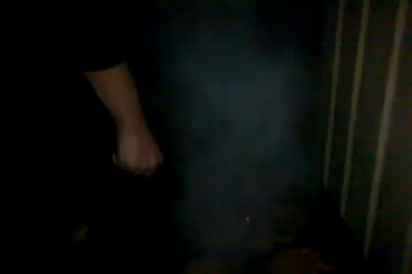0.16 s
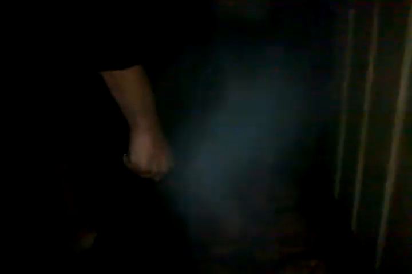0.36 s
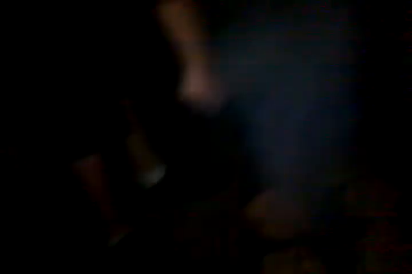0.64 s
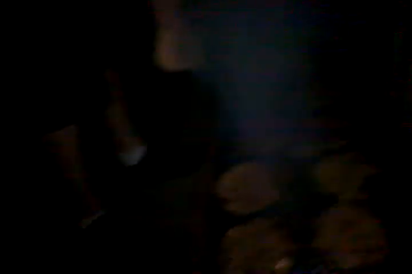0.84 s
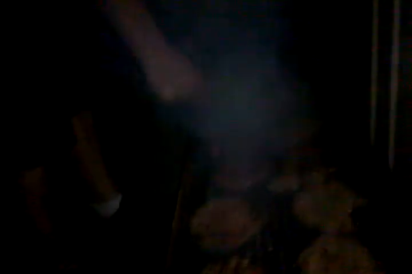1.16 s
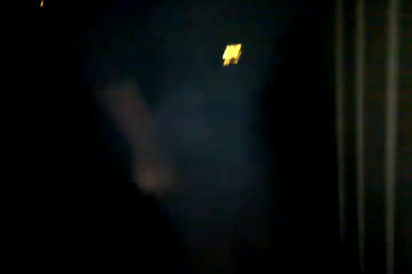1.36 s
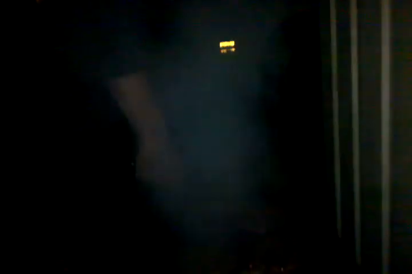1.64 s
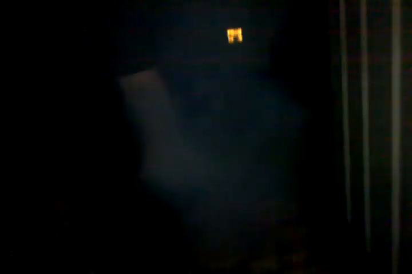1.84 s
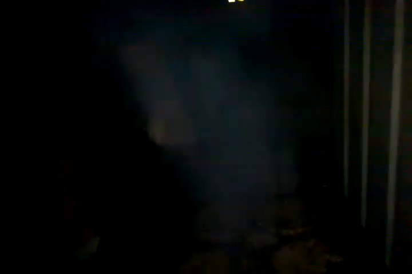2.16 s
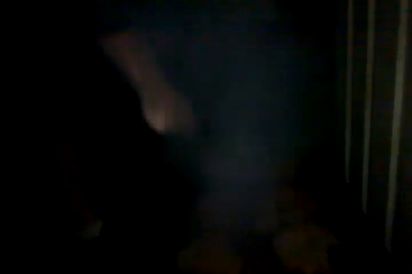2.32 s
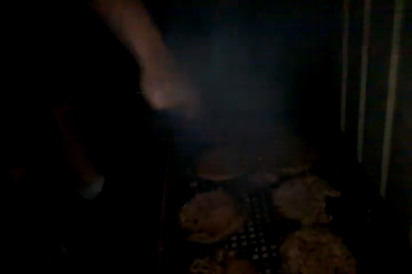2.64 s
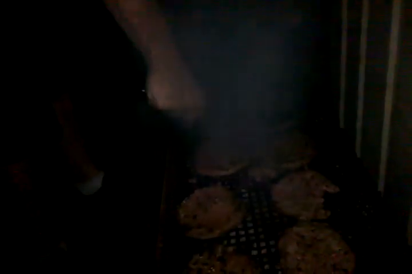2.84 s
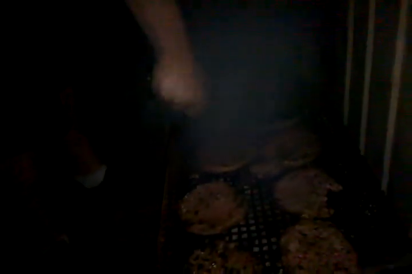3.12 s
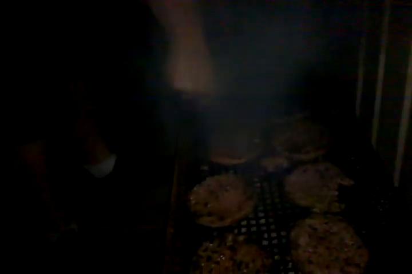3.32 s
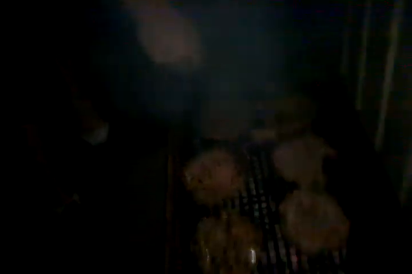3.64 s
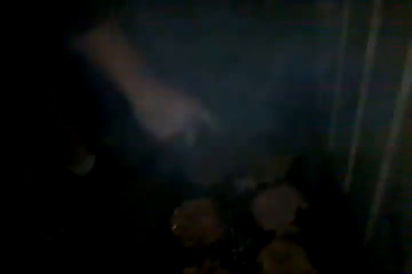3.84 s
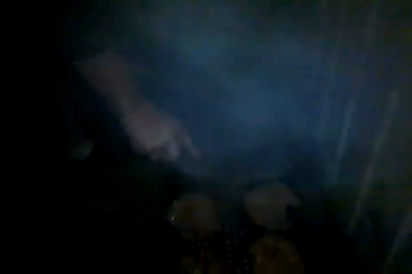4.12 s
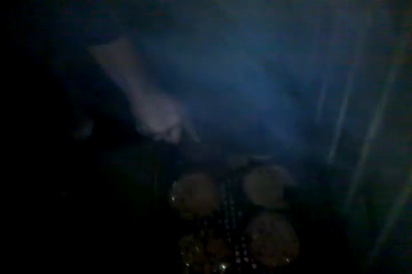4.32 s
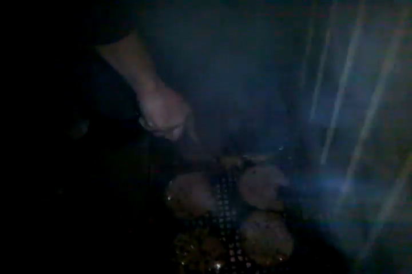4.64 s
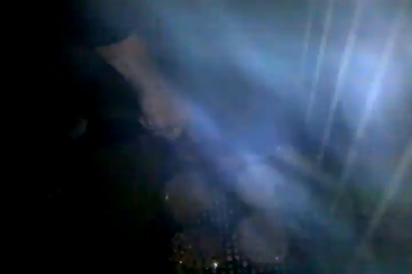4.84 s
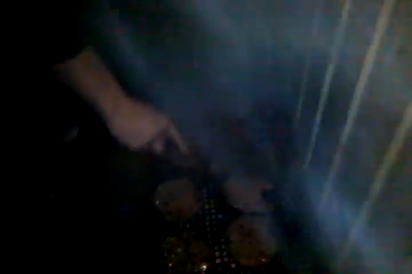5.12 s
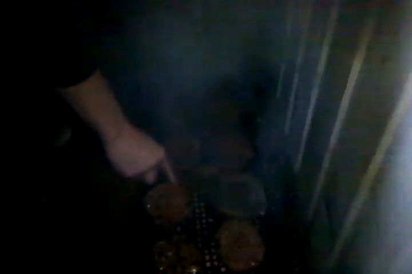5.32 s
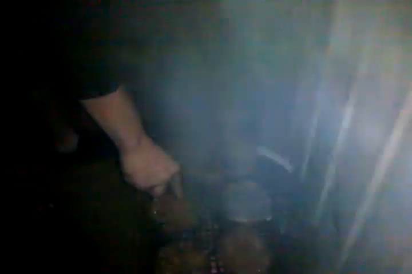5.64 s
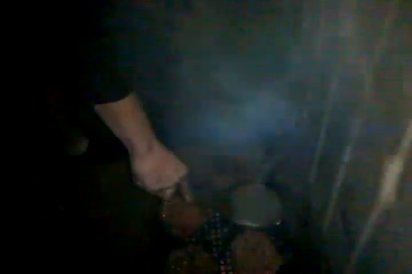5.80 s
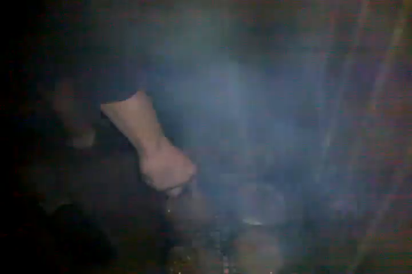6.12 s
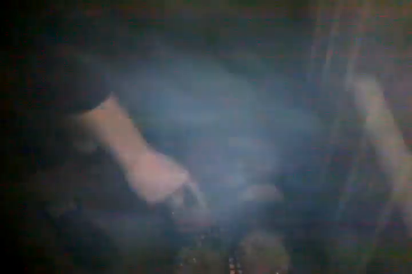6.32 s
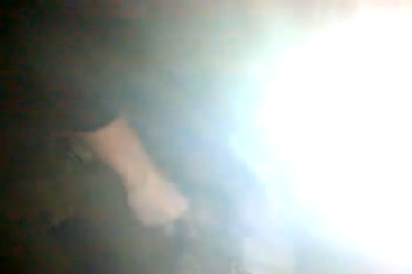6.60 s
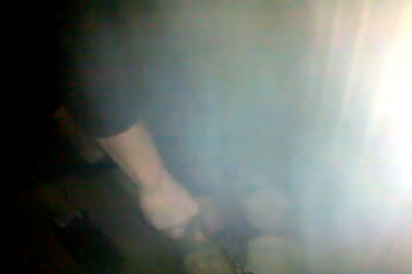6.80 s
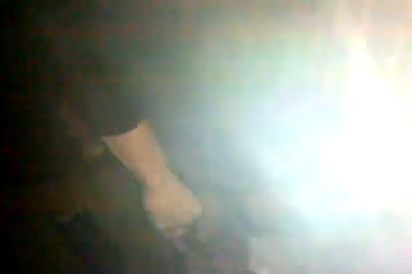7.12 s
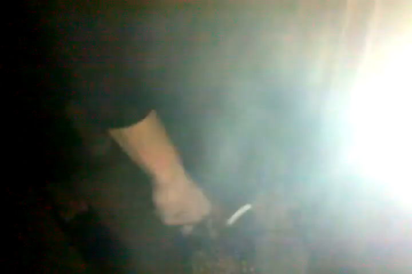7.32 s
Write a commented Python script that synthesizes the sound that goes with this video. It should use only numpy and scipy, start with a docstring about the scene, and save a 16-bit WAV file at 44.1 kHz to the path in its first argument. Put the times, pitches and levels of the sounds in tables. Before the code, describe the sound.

A continuous hiss of frying fat, close to the microphone in open air, sputters and spits without pause. Juice wells up in wetter swells early on and around the middle, while a fire flutters softly underneath. Soft bumps knock the grill's body now and then. Later come two short, quickly damped metal clicks on the grate, and finally pressed meat releases a narrow, faintly pitched hiss of steam.

```python
"""A close hiss of frying fat, spitting and popping: meat patties on an outdoor grill at night, just above the grate.
Random clicks ringing at many pitches, over noise, make the sizzle, sputter and simmer; sharp snaps make the spits.
Juice wells up now and then, and coloured noise murmurs below as the fire.
A metal utensil taps the grate twice as ringing modes, and bursts of noise knock dully in the grill's body.
Near the end a pressed patty lets out a jet of steam: noise through two resonances."""
import sys
import numpy as np
from scipy import signal
from scipy.fft import rfft, irfft, next_fast_len
from scipy.io import wavfile

SR = 44100
rng = np.random.default_rng(int(sys.argv[2]) if len(sys.argv) > 2 else 0)


def persist_wave(psi):
    """Save psi, clipped to +-1, as 16-bit WAV."""
    counts = np.round(np.clip(psi, -1, 1) * 32767).astype(np.int16)
    wavfile.write(sys.argv[1], SR, np.atleast_2d(counts).T)


N = 329118  # length [samples]
USUAL_VIGOUR_DB = -38.5  # frying vigour at which the sputter and the lesser spits have their stated settings


def from_db(db):
    """Decibels to gain."""
    return 10 ** (np.asarray(db) / 20)


def rms_one(x):
    """Scale to an rms of 1."""
    return x / np.sqrt(np.mean(x ** 2) + 1e-20)


def in_time(rows):
    """Each column of a curve, interpolated at every sample."""
    s, *columns = np.transpose(rows)
    return [np.interp(np.arange(N) / SR, s, column) for column in columns]


def swells(rows):
    """Bell-shaped rises, summed: one curve in dB for each level column."""
    middle_s, half_s, *rises_db = np.transpose(rows)
    offset_s = np.arange(N) / SR - middle_s[:, None]
    bells = np.exp(-(offset_s / half_s[:, None]) ** 2)
    return np.array(rises_db) @ bells


def drift(rate):
    """Slow chance with a spread of 1, changing about rate times a second."""
    r = np.exp(-40 * np.pi * rate / SR)  # worked out at every 20th sample
    noise = rng.standard_normal(N // 20 + 4002)
    slow = signal.lfilter([1], [1, -2 * r, r * r], noise)[4000:]  # drop the filter's start
    return np.interp(np.arange(N) / 20, np.arange(len(slow)), rms_one(slow))


def coloured(x, spectrum):
    """Give a steady texture its colour by weighting its spectrum; rms 1."""
    size = next_fast_len(N + SR // 10)
    hz, level_db = np.transpose(spectrum)
    bins_hz = np.maximum(np.arange(size // 2 + 1) * SR / size, 1)
    weight_db = np.interp(np.log(bins_hz), np.log(hz), level_db, -90, -90)
    return rms_one(irfft(rfft(x, size) * from_db(weight_db), size)[:N])


def resonance(x, hz, width_hz):
    """Two-pole resonance with a gain of 1 on top."""
    r = np.exp(-np.pi * width_hz / SR)
    feed = np.array([1, 0, -1]) * (1 - r * r) / 2
    return signal.lfilter(feed, [1, -2 * r * np.cos(2 * np.pi * hz / SR), r * r], x + 1e-18)


def low_cut(x, hz):
    """Small things radiate little bass."""
    return signal.sosfilt(signal.butter(3, hz, "high", fs=SR, output="sos"), x)


def add(out, s, sound):
    """Mix a short sound in at s seconds."""
    at = round(s * SR)
    out[at:at + len(sound)] += sound[:max(N - at, 0)]


def scattered(x, tail_db, fade_s):
    """The grate and the walls of the grill scatter a short spray of reflections after each sound."""
    t = np.arange(SR // 50) / SR
    spray = rng.standard_normal(len(t)) * np.exp(-t / fade_s)
    spray /= np.linalg.norm(spray)
    return x + from_db(tail_db) * signal.fftconvolve(x, spray)[:len(x)]


def bursts(per_s, spread_db, clump_db, clump_rate):
    """Bubbles burst at random, in clumps, as clicks of either sign; most are tiny, a few are large."""
    chance = per_s * from_db(clump_db * drift(clump_rate)) / SR
    born = rng.random(N) < chance
    sizes = from_db(spread_db * np.minimum(rng.exponential(1, N), 4.2))
    return born * sizes * rng.choice([-1, 1], N)


def bubbles(clicks, low_hz, high_hz, width_hz, count=12):
    """Each burst rings briefly at one of count pitches, dealt at random; rms 1."""
    dealt = rng.integers(0, count, N)
    pitches_hz = np.linspace(low_hz, high_hz, count)
    return rms_one(sum(resonance(clicks * (dealt == k), hz, width_hz) for k, hz in enumerate(pitches_hz)))


def rumble(roar_db):
    """Low rumble under the grill: coloured noise whose level wanders slowly."""
    # colour of the rumble: (frequency [Hz], relative level [dB])
    rumble_colour = [(25, -48.5), (40, -39.5), (62, -22), (82, -13.5), (98, -2), (110, -5.5), (123, 1.5),
                     (140, -2.5), (160, -3.5), (200, -8), (260, -6.5), (350, -19), (600, -30)]
    level_db = -60.5 + roar_db + 0.67 * drift(4.3)
    return from_db(level_db) * coloured(rng.standard_normal(N), rumble_colour)


def fire(flutter_db):
    """The fire flutters below the grate: coloured noise of unsteady level that slowly falls."""
    # colour of the fire: (frequency [Hz], relative level [dB])
    fire_colour = [(120, -20), (250, -8.5), (330, -2), (410, 1), (510, 0), (640, -6.5), (900, -13),
                   (1500, -29.5)]
    start_db, db_per_s = -61.5, -0.22
    level_db = start_db + db_per_s * np.arange(N) / SR + flutter_db + 1.4 * drift(24)
    return from_db(level_db) * coloured(rng.standard_normal(N), fire_colour)


def simmer(welling_db):
    """Larger, slower bubbles of juice ring low over noise, and slowly die down."""
    # colour of the simmer: (frequency [Hz], relative level [dB])
    simmer_colour = [(350, -21), (650, -1), (900, -1.5), (1300, -2.5), (1700, -5), (2600, -19)]
    start_db, db_per_s = -58.3, -0.66
    clicks = bursts(per_s=900, spread_db=2.0, clump_db=4, clump_rate=15)
    juice = bubbles(clicks, 500, 1880, width_hz=260)
    texture = juice + from_db(9.5) * rng.standard_normal(N)
    level_db = start_db + db_per_s * np.arange(N) / SR + welling_db
    return from_db(level_db) * coloured(texture, simmer_colour)


def bumps():
    """A soft, rough push swells and dies, and sets the hollow body of the grill sounding."""
    # dull knocks: (time [s], level [dB], swell time [s], brightness as low-pass edge [Hz])
    knocks = [(.214, -42.5, 0.0022, 2500), (1.899, -44.5, 0.0023, 650), (3.982, -51.5, 0.0029, 1200),
              (4.133, -47.5, 0.0035, 1500), (5.415, -45, .001, 1500), (5.541, -43.5, 0.0095, 1900),
              (6.466, -50, 0.01, 1500), (6.495, -42.5, 0.01, 2000), (6.581, -55, .016, 110),
              (7.277, -51.5, 0.0066, 450)]
    # resonances of the sheet-metal body: (frequency [Hz], width [Hz], relative level [dB])
    body = [(202, 46, -1), (323, 89, 1.5), (480, 170, -3.5), (626, 39, -0.5), (895, 53, -3.5),
            (1150, 62, 0.5), (1520, 57, 1.5), (1850, 56, 3), (2135, 45, 2.5)]
    out, t = np.zeros(N), np.arange(SR // 4) / SR
    for (s, level_db, swell_s, bright_hz), noise in zip(knocks, rng.standard_normal((len(knocks), len(t)))):
        shape = t / swell_s * np.exp(1 - t / swell_s)
        push = signal.sosfilt(signal.butter(2, bright_hz, fs=SR, output="sos"), noise * shape)
        # neighbouring resonances take opposite signs
        sound = sum((-1) ** k * from_db(db) * resonance(push, hz, width_hz)
                    for k, (hz, width_hz, db) in enumerate(body))
        sound = low_cut(sound + from_db(-13) * resonance(push, 900, 2500), 140)
        add(out, s, from_db(level_db) * sound * np.linalg.norm(shape) / np.linalg.norm(sound))
    return out


def steam_jet():
    """Steam forced through a narrow gap hisses with a faint pitch, rising and then holding."""
    # resonances, each passed twice: (frequency [Hz], width of one pass [Hz], relative level [dB])
    gap = [(4530, 260, 1), (6550, 770, -1)]
    start_s, rise_s, level_db = 7.03, 0.073, -43
    flow = rng.standard_normal(N)
    opening = np.clip((np.arange(N) / SR - start_s) / rise_s, 0, 1)
    hiss = sum(from_db(db) * resonance(resonance(flow, hz, width_hz), hz, width_hz)
               for hz, width_hz, db in gap)
    return from_db(level_db) * opening * rms_one(hiss)


def taps():
    """Metal on metal: a gritty contact, then modes that the meat soon damps; the point of contact favours some."""
    # contacts with the grate: (time [s], strength [dB], favoured pitch [Hz], reach of that favour [octaves])
    contacts = [(5.5428, -19, 4800, .5), (5.5443, -17.5, 2650, .3), (5.5454, -8.5, 4940, 0.39),
                (5.5522, -21.5, 3200, 0.16), (6.472, -21, 4800, .2), (6.4908, -18.5, 4600, 0.11),
                (6.4958, -13.5, 4560, 0.079), (6.497, -18, 2800, 0.07)]
    # ring of utensil and grate: (frequency [Hz], relative level [dB], time to fall by 60 dB [s])
    metal = [(2450, -9, 0.026), (2815, -14, 0.049), (3204, -9.5, 0.068), (3480, -25, .04),
             (3950, -3.5, 0.028), (4320, -10, 0.031), (4500, -12, 0.027), (4720, -19, .03),
             (5400, -5.5, 0.032), (5940, -20, 0.033), (6650, -17, 0.022)]
    out, t = np.zeros(N), np.arange(SR // 5) / SR
    hz, mode_db, t60 = np.transpose(metal)[:, :, None]
    phases = rng.uniform(0, 2 * np.pi, (len(contacts), len(metal), 1))
    grits = rng.standard_normal((len(contacts), len(t))) * np.exp(-t / .0005)
    for (s, strength_db, favoured_hz, reach), phase, grit in zip(contacts, phases, grits):
        favour_db = -6 * np.log2(1 + (np.log2(hz / favoured_hz) / reach) ** 2)
        decay = from_db(mode_db + favour_db - 60 * t / t60)
        ring = np.sum(decay * np.sin(2 * np.pi * hz * t + phase), axis=0)
        tick = resonance(grit, favoured_hz, 5000 * reach)
        tick /= np.linalg.norm(tick)
        add(out, s, from_db(strength_db) * (from_db(-5.5) * ring + from_db(6.0) * tick))
    return low_cut(out, 1200)


def lesser_spits(vigour_db):
    """Random small drops, as rows for pops(); harder frying makes them more frequent and stronger."""
    usual_per_s, usual_db, spread_db, pitch_hz, edge_hz = 3.0, -17, 2.5, 5100, 2100  # dB before the gain in pops()
    excess_db = vigour_db - USUAL_VIGOUR_DB
    born = np.flatnonzero(rng.random(N) < usual_per_s * from_db(excess_db) / SR)
    energy_db = usual_db + excess_db + spread_db * rng.standard_normal(N)
    return [(at / SR, energy_db[at], pitch_hz, edge_hz) for at in born]


def pops(drops, width_hz=3400, spray_db=-14.0, spray_s=0.0011, gain_db=2.2):
    """A drop of fat bursts: one sharp snap and a few milliseconds of spray, cut below the drop's lower edge."""
    out, t = np.zeros(N), np.arange(SR // 50) / SR
    for (s, energy_db, hz, edge_hz), noise in zip(drops, rng.standard_normal((len(drops), len(t)))):
        push = (t == 0) + from_db(spray_db) * noise * np.exp(-t / spray_s)
        snap = low_cut(resonance(push, hz, width_hz), edge_hz)
        add(out, s, from_db(energy_db + gain_db) * snap / np.linalg.norm(snap))
    return out


def frying(vigour_db, welling_db):
    """Fine sizzle and coarser sputter over smooth steam; the sharpest crackles sound in both."""
    # colour of the fine sizzle: (frequency [Hz], relative level [dB])
    sizzle_colour = [(1500, -36.5), (2300, -14.5), (2800, -10), (3200, -6), (3700, -3), (4500, -1),
                     (5100, -1), (5700, -1), (6600, 0.5), (7500, -3.5), (9000, 1.5)]
    # colour of the coarse sputter: (frequency [Hz], relative level [dB])
    sputter_colour = [(700, -19.5), (1300, -9), (1750, -3.5), (2100, -0.5), (2600, -2.5), (3300, 0),
                      (5000, -15.5)]
    sizzle_gain_db = 1.25
    usual_sputter_db, sputter_db_per_s = -53.5, -0.2551
    follows = 0.43  # share of the sizzle's swing in dB
    crackle_clicks = bursts(per_s=230, spread_db=3.0, clump_db=2, clump_rate=30)
    crackle = rms_one(scattered(crackle_clicks, tail_db=0, fade_s=0.0015))
    fine_clicks = bursts(per_s=5500, spread_db=3.0, clump_db=1.66, clump_rate=60)
    fine = bubbles(fine_clicks, 2200, 8180, width_hz=1200)
    coarse_clicks = bursts(per_s=1400, spread_db=1.5, clump_db=2.5, clump_rate=25)
    coarse = bubbles(coarse_clicks, 1100, 3790, width_hz=400)
    # the plain noise is the smooth steam
    sizzle = coloured(fine + from_db(-2.0) * crackle + from_db(2.0) * rng.standard_normal(N), sizzle_colour)
    sputter = coloured(coarse + from_db(3.5) * crackle + from_db(3.0) * rng.standard_normal(N), sputter_colour)
    sputter_db = usual_sputter_db + follows * (vigour_db - USUAL_VIGOUR_DB)
    sputter_db = sputter_db + sputter_db_per_s * np.arange(N) / SR + welling_db
    surge_db = .3 * drift(14)  # steam escapes from under the meat in small surges
    mix = from_db(vigour_db + sizzle_gain_db) * sizzle + from_db(sputter_db) * sputter
    return from_db(surge_db) * mix


def reflected(x, echo_db=-18.0, phase_rad=1.6):
    """One early reflection ripples the spectrum; the ripples glide upwards as its path shortens."""
    # nearby surface, as the microphone moves: (time [s], extra path [m])
    detour = [(0, 0.29), (1.9, 0.23), (4, 0.23), (5.2, 0.19), (5.9, 0.192), (6.5, 0.18)]
    detour_m, = in_time(detour)
    echo = np.real(signal.hilbert(x, next_fast_len(N))[:N] * np.exp(1j * phase_rad))
    lag = detour_m / 343 * SR  # in samples, at 343 m/s
    return x + from_db(echo_db) * np.interp(np.arange(N) - lag, np.arange(N), echo)


def scene():
    """Open air: only the grill and surfaces close to it reflect."""
    # vigour of the frying, as the fine sizzle before its gain: (time [s], level [dB])
    vigour = [(0.0, -38), (0.41, -37), (0.66, -36), (1.02, -36), (1.68, -38.5), (1.97, -37), (2.53, -36.5),
              (3.05, -37.5), (3.45, -39), (4.26, -39), (4.49, -40.5), (5.15, -41), (5.82, -40.5),
              (6.25, -38.5), (6.77, -40), (7.06, -40.5), (7.25, -38), (7.46, -38)]
    # juice wells out and boils off: (middle [s], half length [s], sputter rise [dB], simmer rise [dB])
    wellings = [(1.35, 0.51, 2.8, 2), (2.5, 0.33, 2.7, .3), (4.0, 0.34, 2.2, 4)]
    # the fire flares: (middle [s], half length [s], flutter rise [dB], rumble rise [dB])
    flares = [(.9, 0.59, 2.2, .8), (2.5, 0.99, 4, 0), (6.8, 0.18, 0.2, 2)]
    # loudest spits: (time [s], energy before the gain in pops() [dB], pitch [Hz], lower edge [Hz])
    loud_drops = [(0.0765, -4.5, 5300, 2180), (0.3458, -13, 4840, 2200), (1.3242, -12, 5830, 2800),
                  (1.4945, -13, 4500, 1700), (1.901, -14, 5420, 2500), (2.5607, -10, 3900, 2000),
                  (2.8602, -12, 5440, 2500), (3.4289, -13, 5380, 2800), (4.1403, -14, 4600, 1800),
                  (4.2258, -16, 5510, 2500), (4.714, -11, 5400, 2700), (4.723, -4, 5000, 1750),
                  (4.771, -10.5, 4200, 1610), (5.3597, -12.5, 5380, 2800), (5.4158, -7, 4700, 850),
                  (7.0623, -15, 3930, 1500)]
    vigour_db, = in_time(vigour)
    sputter_rise_db, simmer_rise_db = swells(wellings)
    flutter_db, roar_db = swells(flares)
    murmur = rumble(roar_db) + fire(flutter_db) + simmer(simmer_rise_db)
    steady = reflected(murmur + frying(vigour_db, sputter_rise_db)) + steam_jet()
    sharp = scattered(taps() + pops(loud_drops), tail_db=-11, fade_s=0.0033)
    return (steady + bumps() + sharp + pops(lesser_spits(vigour_db)))[None]


def record(dry):
    """The recorder's filters: treble falls steeply from about 7 kHz to a faint shelf, then ends at cutoff_hz."""
    cutoff_hz = 9170
    edges_hz = [0, 6750, 7000, 7250, 7500, 7750, 8000, 8700, 9300, SR / 2]
    gains_db = [0, 0, -4, -11, -19, -28, -35, -35, -45, -90]  # the shelf at -35 dB is resampling residue
    response = signal.firwin2(255, edges_hz, from_db(gains_db), fs=SR)
    dull = signal.fftconvolve(dry, response[None], mode="same", axes=1)
    ending = signal.firwin(511, cutoff_hz, window="blackman", fs=SR)
    return signal.fftconvolve(dull, ending[None], mode="same", axes=1)


dry = scene()
out = record(dry)
persist_wave(out)
```